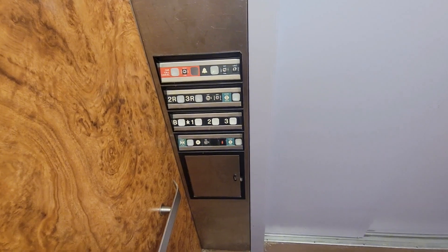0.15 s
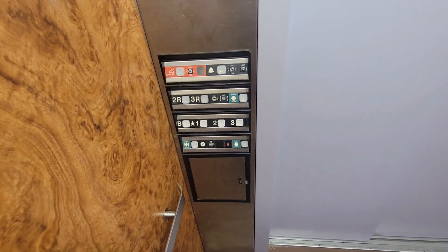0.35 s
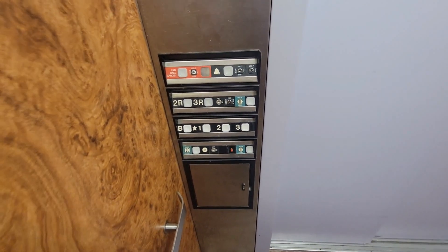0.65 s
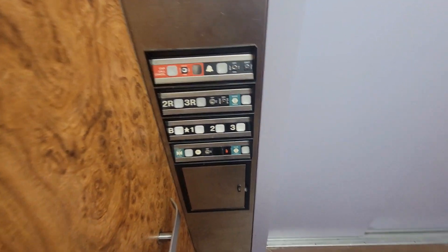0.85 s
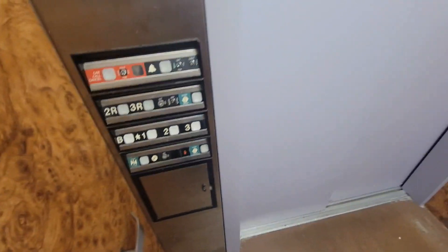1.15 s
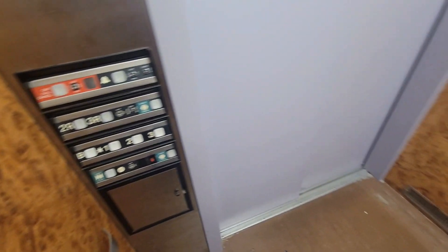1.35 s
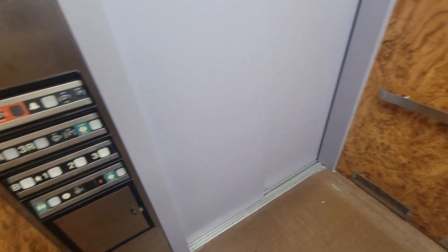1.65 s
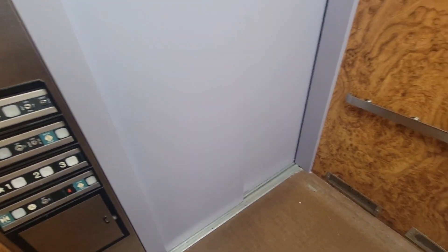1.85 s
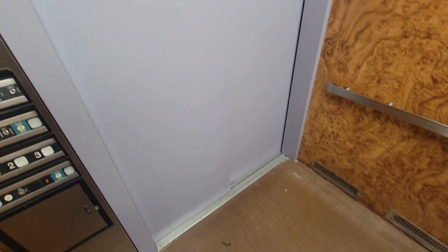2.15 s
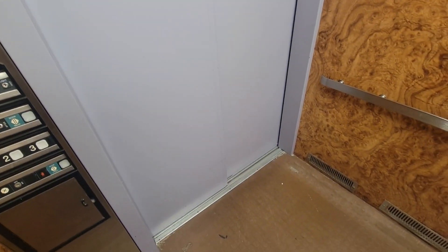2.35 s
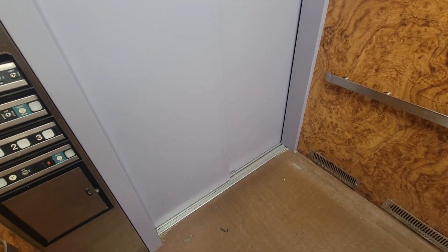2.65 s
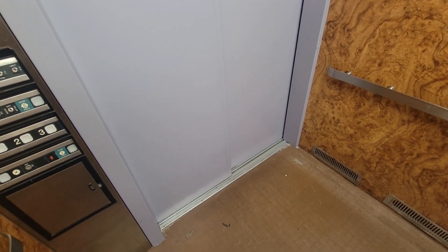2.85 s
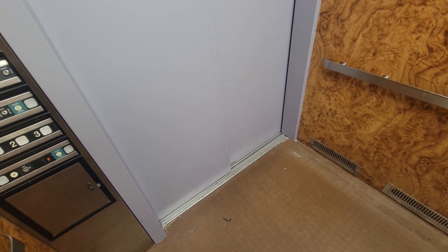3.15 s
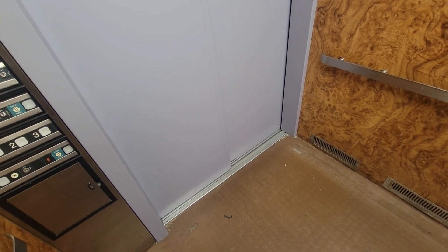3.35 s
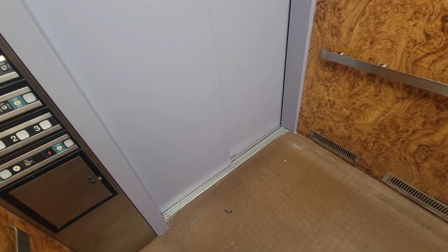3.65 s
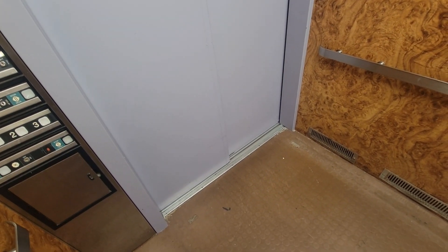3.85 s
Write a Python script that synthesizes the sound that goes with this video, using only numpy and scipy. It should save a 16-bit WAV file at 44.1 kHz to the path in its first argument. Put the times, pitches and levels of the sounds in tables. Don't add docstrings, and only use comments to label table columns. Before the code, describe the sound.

Inside a small wood-panelled elevator car, a steady low rush, rumble and motor hum continue throughout; soft thumps, a few dry ticks, then one sharp close snap near one second, and a faint rub later.

```python
import sys
import numpy as np
from scipy import signal
from scipy.io import wavfile

SR = 44100
rng = np.random.default_rng(int(sys.argv[2]) if len(sys.argv) > 2 else 0)


def rack_gain(trim_db):
    fader = np.asarray(trim_db, float)
    return 10 ** (fader / 20)


def to_wav(sig):
    pcm = np.clip(np.atleast_2d(sig), -1, 1) * 32767
    pcm = np.round(pcm).astype(np.int16)
    wavfile.write(sys.argv[1], SR, pcm.T)


N = 176400
T = np.arange(N) / SR


def rms_one(x):
    return x / np.sqrt(np.mean(x ** 2) + 1e-20)


def noise(channels=2):
    return rng.standard_normal((channels, N))


def filtered(x, order, hz, kind="low"):
    return signal.sosfilt(signal.butter(order, hz, kind, fs=SR, output="sos"), x)


def in_time(rows):
    s, *columns = np.transpose(rows)
    return [np.interp(T, s, column) for column in columns]


def at_hz(points, hz):
    table_hz, values = np.transpose(points)
    return np.interp(np.log(hz), np.log(table_hz), values)


def drift(rate):
    r = np.exp(-80 * np.pi * rate / SR)
    slow = signal.lfilter([1], [1, -2 * r, r * r], rng.standard_normal(N // 40 + 2002))[2000:]
    return np.interp(np.arange(N) / 40, np.arange(len(slow)), rms_one(slow))


def to_pair(mid_side, hz):
    # f/Hz, likeness (1 = same, 0 = unrelated)
    likeness = [(60, 1), (180, 0.95), (380, 0.77), (700, -0.077), (1290, -0.12), (2400, -0.093), (15000, 1)]
    # f/Hz, left minus right/dB
    lean = [(60, -3.5), (200, -0.5), (400, -4.5), (1300, -2), (4400, -5), (8100, -18.5), (15000, -15)]
    alike = np.clip(at_hz(likeness, hz), -1, .985)
    shared = np.sqrt((1 + alike) / 2) * mid_side[0]
    opposite = np.sqrt((1 - alike) / 2) * mid_side[1] * [[1], [-1]]
    return (shared + opposite) * rack_gain(at_hz(lean, hz) * np.array([[.5], [-.5]]))


def banded_noise(spectrum, patchy_db):
    out, together = 0, drift(7.9)
    white = [noise(), noise()]
    edges = np.geomspace(spectrum[0][0], min(spectrum[-1][0], 16000), 15)
    for k, (low, high) in enumerate(zip(edges, edges[1:])):
        band = filtered(white[k % 2], 3, [low, high], "band")
        hz = np.sqrt(low * high)
        flicker_db = patchy_db * (.5 * together + drift(5.6))
        out = out + rack_gain(at_hz(spectrum, hz) + flicker_db) * to_pair(band, hz)
    return rms_one(out)


def ring(clicks, hz, t60):
    r, w = rack_gain(-60 / (t60 * SR)), 2 * np.pi * hz / SR
    return signal.lfilter([np.sin(w)], [1, -2 * r * np.cos(w), r * r], clicks + 1e-18)


def oil_flow():
    # t/s, level/dB
    load = [
        (0.0, -51),
        (1.14, -51),
        (1.64, -51.5),
        (2.0, -53),
        (3.07, -53),
        (3.61, -51),
        (4.0, -52.5),
    ]
    flow_db, = in_time(load)
    return flow_db


def oil_and_air_rush(flow_db):
    # f/Hz, level per Hz/dB
    rush = [(180, -41), (300, -6), (572, -10.5), (786, -17), (1080, -12), (1600, -20.5), (3100, -29),
            (3900, -38), (5850, -51)]
    # f/Hz, level per Hz/dB
    air = [(3800, -22), (4500, -6), (5570, -4), (6000, -13), (7000, -29), (10500, -25), (12900, -18),
           (15900, -20)]
    out = rack_gain(flow_db + 5.5) * banded_noise(rush, 1.15)
    return out + rack_gain(-83 + 1.5 * (flow_db - flow_db.mean())) * banded_noise(air, 1.0)


def motor_hum():
    # t/s, f/Hz, level/dB
    motor = [(0.0, 51.87, -41), (0.23, 49.5, -39), (0.24, 50.27, -48), (0.49, 50.17, -39.5),
             (2.42, 50.8, -41), (2.47, 49.3, -47), (2.64, 49.9, -37), (2.95, 49.68, -43),
             (3.23, 51.53, -38.5), (3.92, 50.15, -43), (3.98, 49.5, -50), (4.0, 49.2, -50)]
    hz, db = in_time(motor)
    hum = np.sin(2 * np.pi * np.cumsum(hz) / SR)
    return np.sqrt(2) * rack_gain(db + 1.1 * drift(13.63)) * hum * rack_gain([[-.3], [.3]])


def rumble(flow_db):
    # f/Hz, level per Hz/dB
    colour = [(12, -3), (20, 0), (38, -6.5), (59, 9.5), (97, -10.5), (166, -0.5), (292, -10.5), (400, -19),
              (520, -38.5), (880, -120)]
    # f/Hz, width/Hz, level/dB
    air_modes = [(81.2, 5, -52.5), (117, 12, -46), (154.7, 7.8, -46), (202.7, 23, -49), (258.2, 11, -51),
                 (317.4, 13, -60.5), (488.3, 9.8, -63.5), (532.5, 14, -56.5), (553.7, 14, -67.5),
                 (654, 23.8, -63.5), (663.8, 11, -64)]
    low = rack_gain(-48) * banded_noise(colour, 5)
    for hz, width_hz, db in air_modes:
        t60 = np.log(1000) / np.pi / width_hz
        low = low + rack_gain(db) * to_pair(rms_one(ring(noise(), hz, t60)), hz)
    return low * rack_gain(0.55 * (flow_db - flow_db.mean()))


def pump_whine():
    # t/s, f/Hz, level/dB, left minus right/dB
    pump = [(0, 376, -67, 43.5), (.35, 379.6, -54.5, -15), (1.4, 373.4, -51.5, 4), (2, 382.1, -56.5, 0.5),
            (3, 386.6, -55.5, 1), (3.5, 389.4, -52.5, -4.5), (4, 395.5, -60, 3.5)]
    hz, db, pan_db = in_time(pump)
    turn = 2 * np.pi * np.cumsum(hz + 1.914 * drift(8.8)) / SR
    return np.sqrt(2) * rack_gain(db + 2.0 * drift(1.67) + pan_db * [[.5], [-.5]]) * np.sin(turn + [[.6], [0]])


def gear_tones():
    # f/Hz, level/dB, left-right phase/rad
    whines = [(835, -66, .5), (862, -69, 2.8), (495, -64, .5), (1104, -70, 2.5)]
    out = 0
    for hz, db, lag in whines:
        turn = 2 * np.pi * np.cumsum(hz + 1.5 * drift(3.54)) / SR
        out = out + np.sqrt(2) * rack_gain(db + 3.03 * drift(4.3)) * np.sin(turn + [[lag], [0]])
    return out


def latch_snap():
    # t/s, level/dB
    snap = [
        (1.19035, 0),
        (1.19099, -6),
        (1.19167, -16),
        (1.19407, -26),
    ]
    # f/Hz, left level/dB, right level/dB, time to drop 60 dB/s
    modes = [(850, -18, -22, .008), (1625, -13, -28, .0045), (3200, -27, -28, .003), (4260, -38, -20, .004),
             (5300, -23, -14, .004), (6050, -31, -23, .004), (7850, -31, -40, .003), (9300, -47, -47, .002),
             (11300, -22, -39, .003), (12900, -47, -15, .003), (14800, -29, -33, .0025)]
    signs = [1, 1, -1, -1, -1, -1, 1, 1, -1, 1, 1]
    # low f/Hz, high f/Hz, level/dB, time to drop 60 dB/s
    tails = [
        (2200, 7000, -52, .55),
        (6500, 15500, -54, .25),
    ]
    start = snap[0][0]
    strain = rack_gain(-36) * np.exp(np.minimum(T - start, 0) / .002) * (T < start)
    out = np.zeros((2, N))
    for (hz, left_db, right_db, t60), sign in zip(modes, signs):
        clicks = strain * rng.standard_normal(N)
        for s, db in snap:
            clicks[int(s * SR)] += rack_gain(db)
        out += rack_gain([[left_db], [right_db]]) * ring(clicks, hz, t60) * sign
    out[1] = np.roll(out[1], int(.00008 * SR))
    out = filtered(out, 2, 700, "high")
    for low_hz, high_hz, db, t60 in tails:
        fade = np.exp(-np.log(1000) * np.maximum(T - start, 0) / t60) * (T > start)
        out += filtered(noise(), 3, [low_hz, high_hz], "band") * rack_gain(db) * fade
    return out


def swell(start_s, db, hz, glide, rise_s):
    u = np.maximum(T - start_s, 0)
    shape = u / rise_s * np.exp(1 - u / rise_s)
    return rack_gain(db) * shape * np.sin(2 * np.pi * (hz * u + glide * u * u / 2))


def ram_bounces():
    # t/s, level/dB, f/Hz
    sways = [
        (.70, -29, 30),
        (1.60, -33, 31),
        (2.23, -38, 31),
        (3.0, -43, 29),
        (3.72, -41, 32),
    ]
    return sum(swell(s, db, hz, 0, .045) for s, db, hz in sways)


def guide_shoe_jolts():
    # t/s, level/dB, f/Hz, glide/Hz per s
    jolts = [(0.089, -34, 160.4, 282), (0.719, -37, 83.6, -14), (1.041, -35.5, 113.6, 100),
             (1.292, -32.5, 130, 119), (1.477, -34, 157, 16), (2.049, -31.5, 117, 5),
             (2.74, -34.5, 154, 16), (3.504, -33, 89, 608), (3.569, -30.5, 177, 1502), (3.578, -32, 75, -3),
             (3.6, -40.5, 278.7, -6)]
    return sum(swell(s, db, hz, glide, 0.017) for s, db, hz, glide in jolts)


def ticks():
    # t/s, level/dB, f/Hz, bright edge level/dB
    tick_list = [
        (.9908, -25.5, 1550, 1),
        (0.993, -33, 1710, -19),
        (1.0833, -37, 2460, -35),
        (1.1015, -48, 5400, -3),
        (1.386, -42, 5030, -1),
        (1.7205, -72, 4030, -9),
    ]
    out = 0
    for s, db, hz, edge_db in tick_list:
        click = (np.arange(N) == int(s * SR)) * rack_gain(db)
        soft = filtered(ring(click, hz, .0045), 2, [hz / 4.2, hz * 2.6], "band")
        out = out + soft - rack_gain(edge_db) * ring(click, 3200, 0.00036)
    return filtered(out, 4, 4600)


def shoe_rub():
    start_s, rise_s, hold_s, fall_s = 3.5, 0.036, 0.069, 0.16
    shape = np.interp(T - start_s, np.cumsum([0, rise_s, hold_s, fall_s]), [0, 1, 1, 0])
    scrape = filtered(filtered(noise(), 2, [1200, 4000], "band"), 4, 5600)
    return rack_gain(-58 + 2.0 * drift(25)) * shape * rms_one(scrape)


def handling_noise():
    return rack_gain(-66) * rms_one(filtered(noise(1), 2, 106)) * [[1], [-1]]


def scene():
    flow_db = oil_flow()
    out = oil_and_air_rush(flow_db) + motor_hum() + rumble(flow_db)
    out = out + pump_whine() + gear_tones()
    out = out + latch_snap() + ram_bounces() + guide_shoe_jolts()
    return out + ticks() + shoe_rub() + handling_noise()


def low_pass(x):
    return signal.sosfilt(signal.butter(12, 16500, fs=SR, output="sos"), x)


def record(dry):
    mix = signal.sosfilt(signal.cheby2(10, 60, 16800, fs=SR, output="sos"), dry)
    return low_pass(mix)


dry = scene()
out = record(dry)
to_wav(out)
```